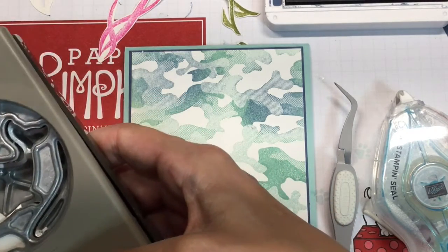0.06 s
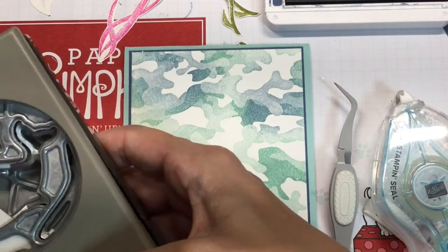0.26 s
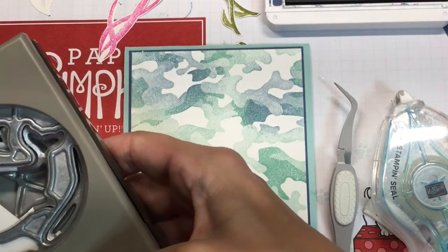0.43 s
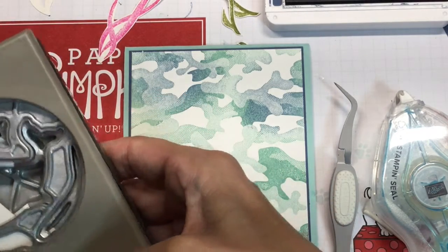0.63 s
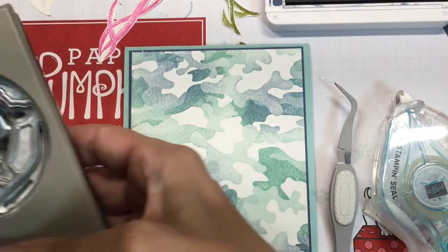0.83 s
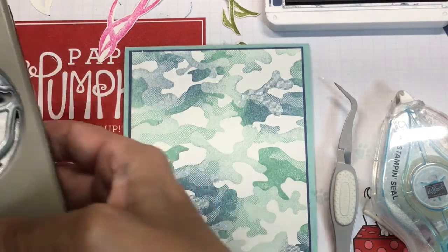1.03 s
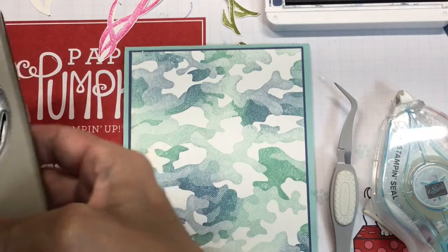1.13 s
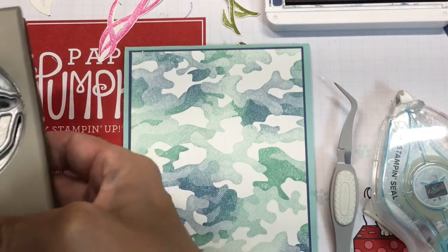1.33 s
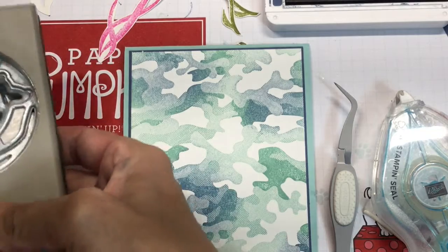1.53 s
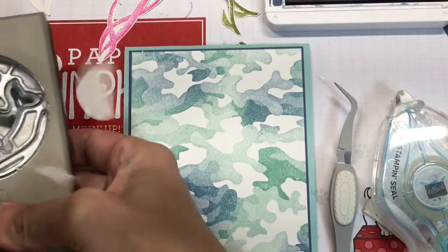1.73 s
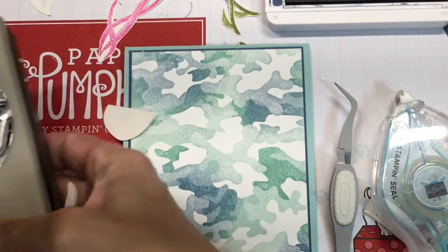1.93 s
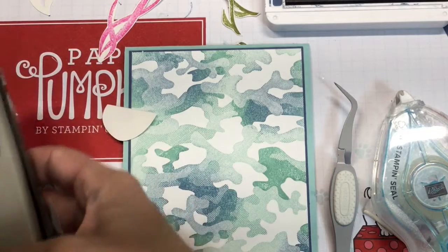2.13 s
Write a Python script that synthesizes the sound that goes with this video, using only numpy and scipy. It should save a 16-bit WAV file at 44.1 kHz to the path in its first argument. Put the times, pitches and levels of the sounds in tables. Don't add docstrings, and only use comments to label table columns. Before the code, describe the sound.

Paper punch bites and snaps loudly through cardstock in a quiet room, followed by light card rattling

```python
import sys
import numpy as np
from scipy import signal
from scipy.io import wavfile
from scipy.ndimage import uniform_filter1d

SR = 44100
rng = np.random.default_rng(int(sys.argv[2]) if len(sys.argv) > 2 else 0)


def boost_factor(decibels):
    exponent = np.asarray(decibels, float) / 20
    return 10 ** exponent


def output_pcm(signal):
    pcm = np.clip(np.atleast_2d(signal).T, -1, 1) * 32767
    wavfile.write(sys.argv[1], SR, np.round(pcm).astype(np.int16))


N = 95608

# (frequency [Hz], level [dB], t60 [s])
DESK_MODES = [(200, -15.5, 0.078), (392, -2.5, 0.0182), (575, -0.5, 0.029), (815, -4, 0.0083),
              (1080, -3, 0.048)]
# (frequency [Hz], level [dB per Hz])
RUB_SPECTRUM = [(150, -9), (400, -1.5), (1000, 3), (1900, 1.5), (3200, 1), (5000, -4), (9000, -11),
                (15500, -15.5)]


def rms_one(x):
    return x / np.sqrt(np.mean(x ** 2) + 1e-20)


def at_hz(points, hz, axis=1):
    points = np.array(points)
    return np.interp(np.log(hz), np.log(points[:, 0]), points[:, axis])


def filtered(order, hz, kind, x):
    return signal.sosfilt(signal.butter(order, hz, kind, fs=SR, output="sos"), x)


def drift(rate_hz):
    r = np.exp(-80 * np.pi * rate_hz / SR)
    slow = signal.lfilter([1], [1, -2 * r, r * r], rng.standard_normal(N // 40 + 2002))[2000:]
    return np.interp(np.arange(N) / 40, np.arange(len(slow)), rms_one(slow))


def ring(clicks, hz, t60_s):
    r = boost_factor(-60 / (t60_s * SR))
    w = 2 * np.pi * hz / SR
    return signal.lfilter([0, np.sin(w)], [1, -2 * r * np.cos(w), r * r], clicks + 1e-18)


def pulse(time_s, level_db):
    return (np.arange(N) == int(time_s * SR)) * boost_factor(level_db)


def bands(pair):
    edges_hz = 25 * 2 ** np.arange(0, 9.5, 1 / 3)
    for k, (low, high) in enumerate(zip(edges_hz, edges_hz[1:])):
        yield np.sqrt(low * high), filtered(2, [low, high], "band", pair[k % 2])


def coloured(spectrum, patchy_db, grain=0., tilt=0.):
    grains_per_s, spread_db = 3500, 10.5
    heights = boost_factor(spread_db * np.minimum(rng.exponential(1, N), 5))
    grains = heights * rng.choice([-1, 1], N) * (rng.random(N) < grains_per_s / SR)
    share = np.clip(grain, 0, 1)
    pair = np.sqrt(1 - share) * rng.standard_normal((2, N)) + np.sqrt(share) * rms_one(grains)
    together = drift(32)
    parts = [(hz, boost_factor(at_hz(spectrum, hz)) * x) for hz, x in bands(pair)]
    scale = np.std(sum(x for _, x in parts))
    out = np.zeros(N)
    for hz, x in parts:
        flicker_db = patchy_db * (together + drift(23.6))
        out += x * boost_factor(tilt * np.log2(hz / 2000) + flicker_db)
    return out / scale


def snaps(contacts, modes):
    crumbs_per_s, crumb_db, crumb_s = 14000, -16, 0.0046
    crack_low_hz, crack_top_hz, crack_s, crack_rise_s = 3000, 8640, 0.0021, 0.0011
    snap_cycles, soft_hz = 6.36, 3000
    t = np.arange(SR // 4) / SR
    out = np.zeros(N + SR)
    for time_s, peak_db, snap_hz, crack_db, body_db in contacts:
        torn = rng.standard_normal(len(t)) * (rng.random(len(t)) < crumbs_per_s / SR)
        force = boost_factor(crumb_db) * torn * np.exp(-t / crumb_s)
        force[0] = 1

        push = np.diff(filtered(2, soft_hz, "low", force), prepend=0) * SR / (2 * np.pi)
        body = np.zeros(len(t))
        for hz, db, t60_s in modes:
            gain = boost_factor(db + rng.normal(0, 1.5)) * rng.choice([-1, 1])
            body += gain * ring(push / hz, hz * rng.normal(1, 0.012), t60_s)

        t60_s = snap_cycles / snap_hz
        snap = ring(force, snap_hz, t60_s) + 0.33 * ring(force, 1.37 * snap_hz, t60_s)
        snap = filtered(2, [snap_hz / 1.35, snap_hz * 1.7], "band", snap)

        envelope = (np.exp(-t / crack_s) + 1e-9) * np.minimum(t / crack_rise_s, 1)
        crack = rng.standard_normal(len(t)) * envelope + 2.5 * force
        crack = filtered(1, crack_top_hz, "low", filtered(2, crack_low_hz, "high", crack))

        i = int(time_s * SR)
        out[i:i + len(t)] += boost_factor(peak_db) * (snap + boost_factor(crack_db) * crack + boost_factor(body_db) * body)
    return out[:N]


def room(x):
    # (frequency [Hz], t60 [s], level [dB])
    tail_bands = [(150, 0.19, -25), (399, 0.2, -21.5), (1000, 0.2, -29.5), (1900, 0.17, -28),
                  (3000, .17, -30.5), (5100, 0.15, -25.5), (12100, 0.11, -22)]
    t = np.arange(SR // 2) / SR
    tail = np.zeros(len(t))
    for hz, noise in bands(rng.standard_normal((2, len(t)))):
        tail += noise * boost_factor(at_hz(tail_bands, hz, axis=2) - 60 * t / at_hz(tail_bands, hz))
    return signal.fftconvolve(x, tail * np.clip(t / 0.011, 0, 1) * boost_factor(-14))[:N]


def room_rumble():
    # (frequency [Hz], level [dB per Hz])
    rumble_spectrum = [(25, -39.5), (65, -0.5), (135, -1.5), (230, -13.5), (450, -25), (1000, -31.5),
                       (2500, -39.5), (7000, -42), (15500, -50)]
    return boost_factor(-65.5) * coloured(rumble_spectrum, patchy_db=-1.0)


def fading_knock():
    level_db, t60_s = -70, 0.42
    decay = boost_factor(level_db - 60 * np.arange(N) / SR / t60_s)
    return decay * coloured(RUB_SPECTRUM, patchy_db=1.2, tilt=-3.5)


def spring():
    return ring(pulse(0.73, -75), hz=1190, t60_s=0.2)


def handling_ticks():
    # (time [s], peak [dB], snap pitch [Hz], edge crack [dB], body ring [dB])
    ticks = [(.2865, -54, 1440, -20, -18), (.294, -48, 1500, -20, -35), (.297, -54, 1480, -18, -30),
             (.365, -62, 4020, -27, -15), (.3925, -61, 2340, -21, -10), (.4447, -67, 1450, -12, -14),
             (.469, -59, 2390, -12, -16), (.603, -63, 517, -12, -8), (.6985, -60, 1500, 1, -7),
             (.703, -62, 900, -3, -7), (.7238, -52.5, 1640, -10.5, -11), (.738, -58, 212, -40, -10),
             (.8064, -63, 1470, -5, -29), (1.0884, -66, 1500, -20, -8), (1.509, -62, 4000, -15, -38)]
    return snaps(ticks, DESK_MODES)


def slide():
    # (time [s], level [dB])
    strokes = [
        [(.42, -88), (.48, -84), (.54, -77.5), (.59, -65), (.63, -61), (.675, -64), (.69, -67), (.706, -62.5),
         (.717, -80)],
        [(.755, -104), (.77, -77.5), (.8, -84), (.825, -71), (.85, -102)],
        [(1.07, -100), (1.095, -90), (1.2, -95.5), (1.235, -73.5), (1.275, -111), (1.4, -79)],
        [(.1, -92), (.2, -91), (.3, -87), (.41, -87)],
    ]
    # (frequency [Hz], level [dB per Hz])
    hiss_spectrum = [(250, -7), (600, -12), (1200, -10), (2300, -7), (4300, -8), (6500, -18.5),
                     (10000, -21.5), (15500, -19.5)]
    # (frequency [Hz], width [Hz], level [dB])
    hollows = [(2450, 1240, -13), (4800, 2400, -17), (8980, 1100, 3.5)]
    t = np.arange(N) / SR
    ordered = sorted(strokes, key=lambda stroke: stroke[0][0])
    time_s, level_db = np.transpose([row for stroke in ordered for row in stroke])
    moving = sum((t >= stroke[0][0]) & (t <= stroke[-1][0]) for stroke in strokes)
    hiss = coloured(hiss_spectrum, patchy_db=1.83, grain=0.12)
    resonant = np.zeros(N)
    for hz, width_hz, db in hollows:
        resonant += 2 * boost_factor(db) * filtered(2, [hz - width_hz / 2, hz + width_hz / 2], "band", hiss)
    gate = uniform_filter1d(moving * 1., size=300)
    return boost_factor(np.interp(t, time_s, level_db) - 3.5) * gate * (hiss + resonant)


def rub():
    # (time [s], level [dB], brightness [dB per octave])
    rubbing = [
        (1.681, -85, 1),
        (1.711, -56, -2),
        (1.745, -60.5, -2),
        (1.765, -52.5, -1),
        (1.793, -61, -2.5),
        (1.856, -49, 2),
        (1.864, -57.5, -2.5),
        (1.899, -55.5, -4.5),
        (1.93, -68.5, -8),
        (1.994, -58.5, -4.5),
    ]
    stop_db_per_s = 600
    time_s, level_db, tilt = np.transpose(rubbing)
    t = np.arange(N) / SR
    level_db = np.interp(t, time_s, level_db, -140) - stop_db_per_s * np.maximum(t - time_s[-1], 0)
    tilt = np.interp(t, time_s, tilt)
    return boost_factor(level_db) * coloured(RUB_SPECTRUM, patchy_db=0.9, grain=0.31, tilt=tilt)


def card_taps():
    # (time [s], peak [dB], snap pitch [Hz], edge crack [dB], body ring [dB])
    taps = [(1.684, -37.5, 1090, -16, -38), (1.6842, -38.5, 2380, -12, -15.5),
            (1.6845, -42, 4900, -13.5, -40), (1.710, -42, 1740, -11, -23), (1.7335, -49, 2190, -15, -18),
            (1.7972, -48, 1960, -17, -19), (1.7975, -35, 4850, -13, -40), (1.834, -49, 2100, -22, -30),
            (1.8375, -36.5, 1900, -23, -34), (1.8725, -44, 1070, -19, -3), (1.8865, -40, 890, -25, -19),
            (1.891, -45, 900, -21, -7), (1.910, -43, 940, -27, -16), (1.922, -43, 1320, -23, -3.5),
            (1.940, -45, 1390, -5, -18), (1.9592, -41.5, 1950, -12, -44), (1.9805, -35, 1020, -32, -19),
            (1.9895, -42.5, 1100, 3.5, -26), (1.993, -60.5, 760, -21, -3), (1.7062, -28.5, 1730, -18, -34),
            (1.7205, -35, 1620, -20, -25), (1.7243, -38.5, 1870, -7, -21), (1.730, -34.5, 1770, -16, -16.5),
            (1.689, -39, 1460, -27, -16), (1.7518, -39, 1510, -9, -16.5), (1.7958, -33, 1980, -12, -19.5),
            (1.8145, -38.5, 1760, -31, -34), (1.8705, -41.5, 970, -21, 0.5),
            (1.8845, -33.5, 1170, -9.5, -27), (1.9065, -44, 900, -29, -26), (1.926, -42.5, 1520, -7, -4.5),
            (1.9295, -31.5, 1880, -14.5, -15), (1.9355, -39, 1000, -10, -22), (1.9578, -38, 2030, -16, -32),
            (1.978, -44, 1530, 2, 0), (1.9866, -53, 1120, -1, 9.5), (2.020, -50, 2000, -4.5, -44)]
    return snaps(taps, DESK_MODES)


def lever_stop():
    return ring(uniform_filter1d(pulse(1.5815, -27), size=20), hz=560, t60_s=0.04)


def die_bite():
    # (time [s], peak [dB], snap pitch [Hz], edge crack [dB], body ring [dB])
    bites = [
        (1.4065, -44, 2700, -24, -26.5),
        (1.4088, -26.5, 1700, -13.5, -21),
        (1.410, -32, 1950, -8.5, -10),
        (1.4113, -30, 2040, -3.5, -8),
        (1.4127, -20, 2450, -16.5, -11.5),
        (1.4148, -26, 1590, -22.5, -18),
        (1.4165, -30.5, 1560, -14.5, -15),
        (1.4188, -31.5, 1310, -19.5, -23.5),
        (1.422, -44, 2560, -11, -21.5),
        (1.427, -41, 2410, -8.5, -18.5),
    ]
    # (frequency [Hz], level [dB], t60 [s])
    gripped_modes = [(270, -6, 0.03), (573, -4.5, 0.041), (910, -13.5, 0.025), (1100, -1, 0.018),
                     (1340, -2.5, 0.032), (1534, -1.5, 0.029), (1950, -6.5, 0.019), (2450, -13, 0.051),
                     (1110, -25.5, 0.34), (3100, -7, 0.025), (3770, -32, 0.41), (4350, -10, 0.034),
                     (5370, -6.5, 0.023)]
    return snaps(bites, gripped_modes)


def die_shear():
    # (time [s], peak [dB], snap pitch [Hz], edge crack [dB], body ring [dB])
    cuts = [(1.5225, -34, 3560, -16.5, -29.5), (1.5245, -35, 2644, -14.5, -27.5),
            (1.526, -27.5, 2850, -12, -15), (1.5278, -17.5, 2490, -22, -20),
            (1.5292, -23, 2690, -11.5, -29), (1.534, -26.5, 2620, -13.5, -32),
            (1.542, -34.5, 3000, -6, -27.5), (1.5472, -14.5, 3040, -14, -31.5),
            (1.5487, -19.5, 3520, -12, -18), (1.5505, -21.5, 2710, -20.5, -25),
            (1.5525, -23, 2020, -17.5, -27.5), (1.5565, -29.5, 3300, -15, -26),
            (1.5707, -6.5, 3000, -19.5, -35), (1.5717, -11.5, 3307, -16, -30), (1.5735, -13, 3100, -8, -25),
            (1.5767, -12.5, 3035, -8.5, -17), (1.5785, -15, 3100, -12, -13.5),
            (1.5798, -16.5, 1007, -20, -10.5), (1.5826, -7, 2450, -17.5, -21),
            (1.5829, -10.5, 3750, -12, -37), (1.5845, -10.5, 1926, -19, -31),
            (1.5858, -17, 860, -23, -10.5), (1.589, -30.5, 909, -19.5, -6),
            (1.5915, -30.5, 2200, -7.5, -13.5), (1.597, -29, 4500, -23, -20.5)]
    # (frequency [Hz], level [dB], t60 [s])
    housing_modes = [(151.4, -11.5, 0.024), (430, -18, 0.014), (573, -9.5, 0.054), (601, -9, 0.084),
                     (772, -13.5, 0.065), (1723, -16, 0.029), (2144, -17, 0.044), (945, -1, 0.019),
                     (930, -7, 0.051), (1102, -5.5, 0.053), (1900, -19, 0.025), (2700, -20.5, .03),
                     (3016, -19, .03), (4050, -4.5, .03)]
    return snaps(cuts, housing_modes)


def scene():
    near = handling_ticks() + rub() + card_taps() + lever_stop() + die_bite() + die_shear()
    near = filtered(3, 108, "high", near)
    mix = room_rumble() + fading_knock() + spring() + slide() + near + room(near)
    return mix[None]


def band_limit(x):
    return signal.sosfilt(signal.butter(12, 16990, fs=SR, output="sos"), x)


def record(dry):
    low_pass = signal.cheby2(10, 60, 16900, fs=SR, output="sos")
    mix = signal.sosfilt(low_pass, dry)
    return band_limit(mix)


dry = scene()
out = record(dry)
output_pcm(out)
```